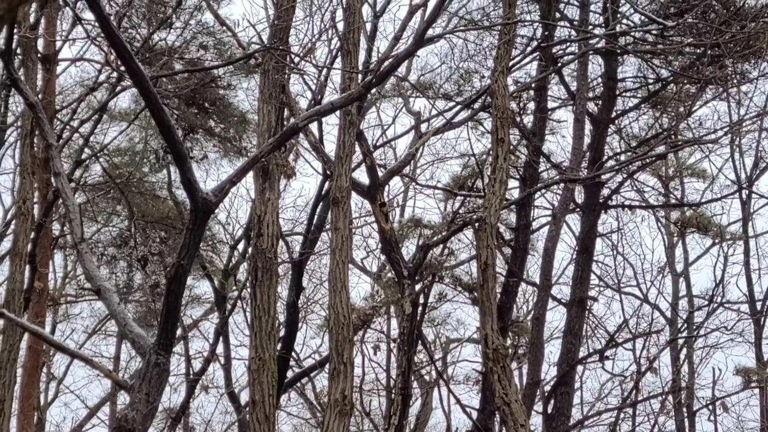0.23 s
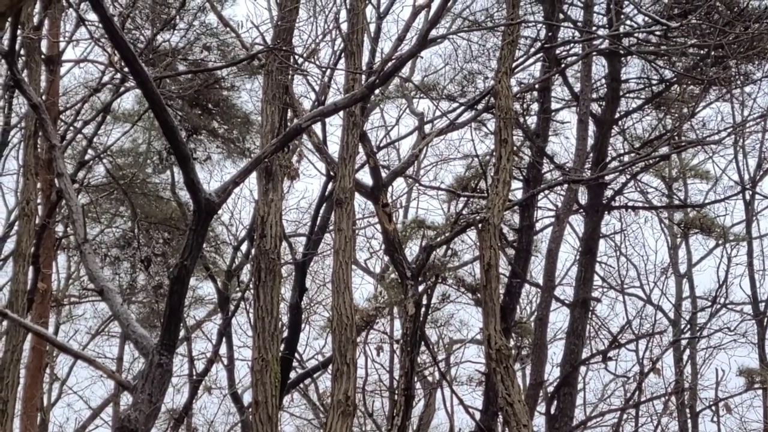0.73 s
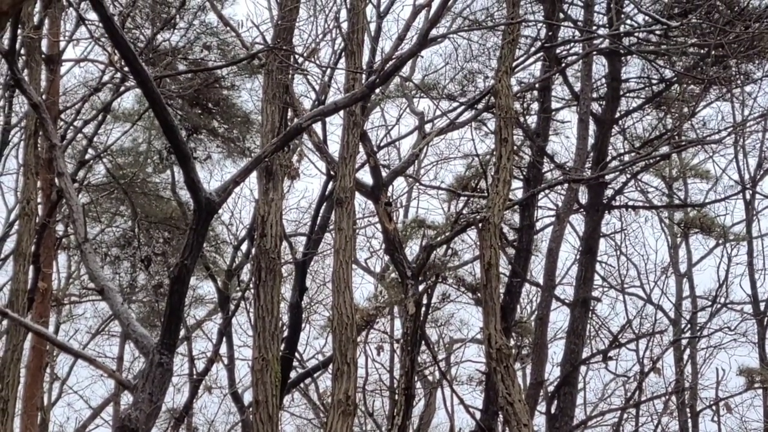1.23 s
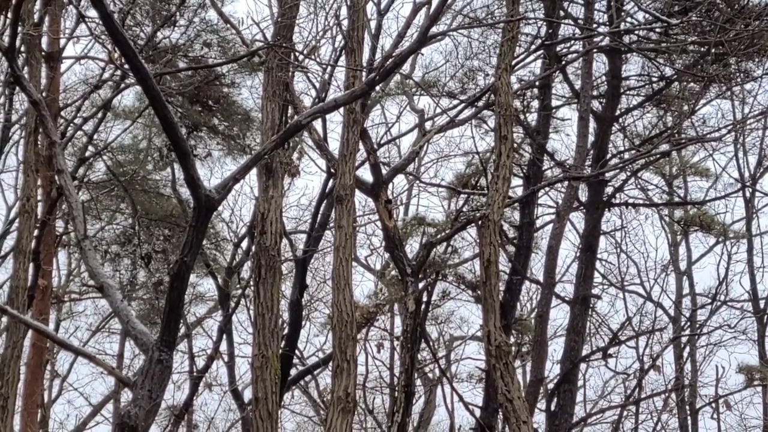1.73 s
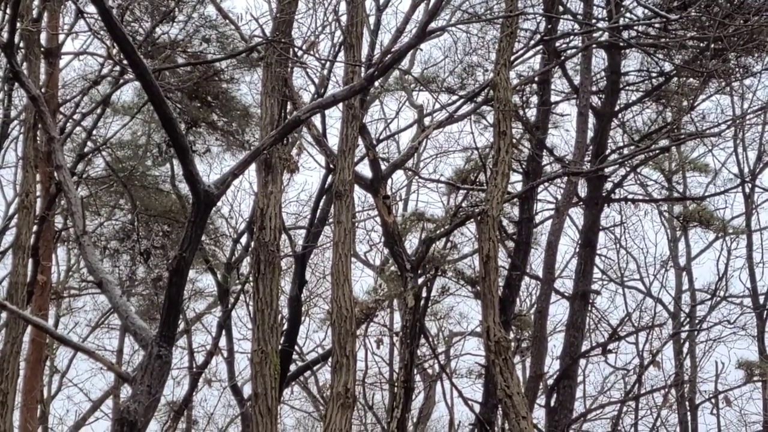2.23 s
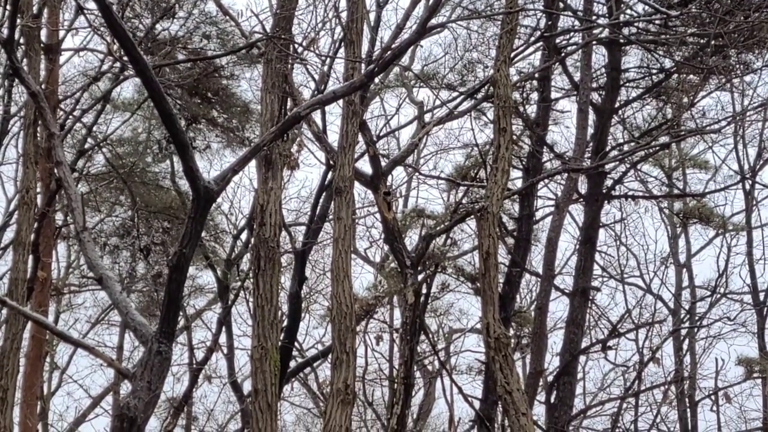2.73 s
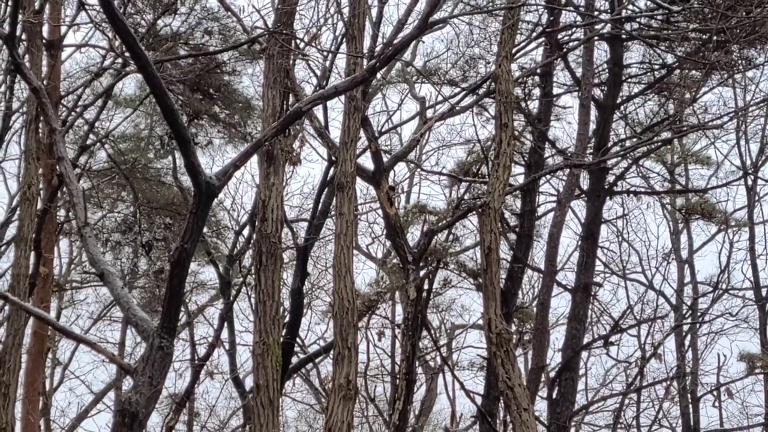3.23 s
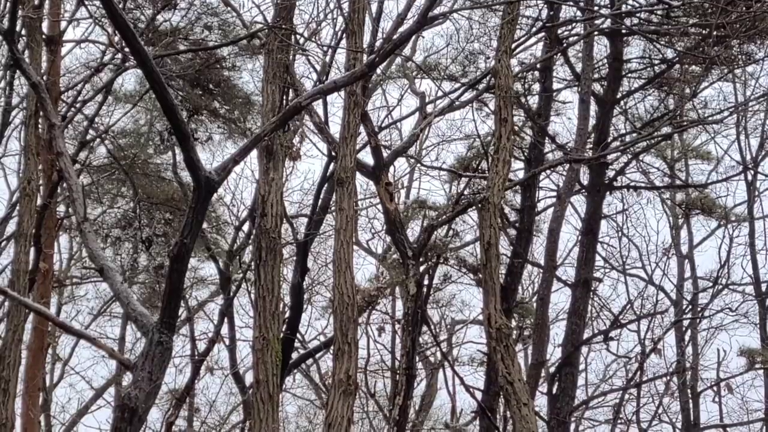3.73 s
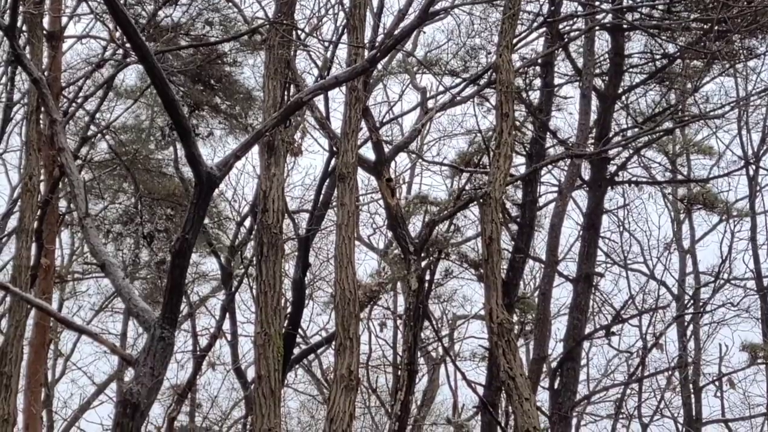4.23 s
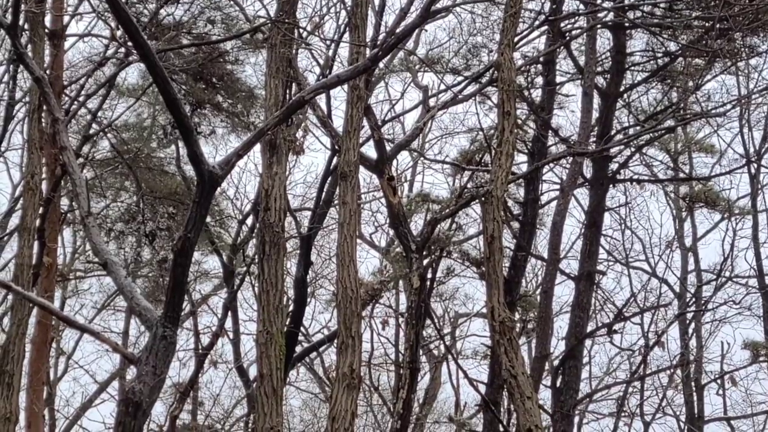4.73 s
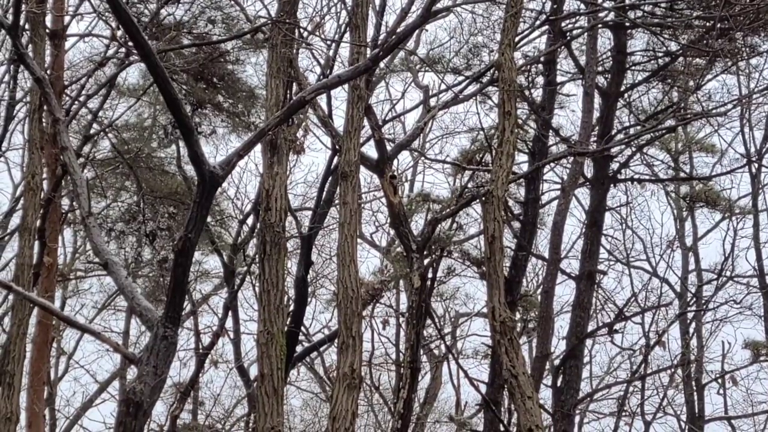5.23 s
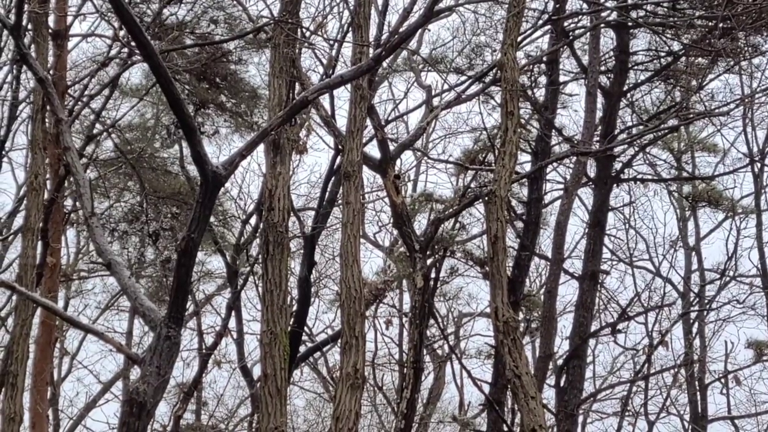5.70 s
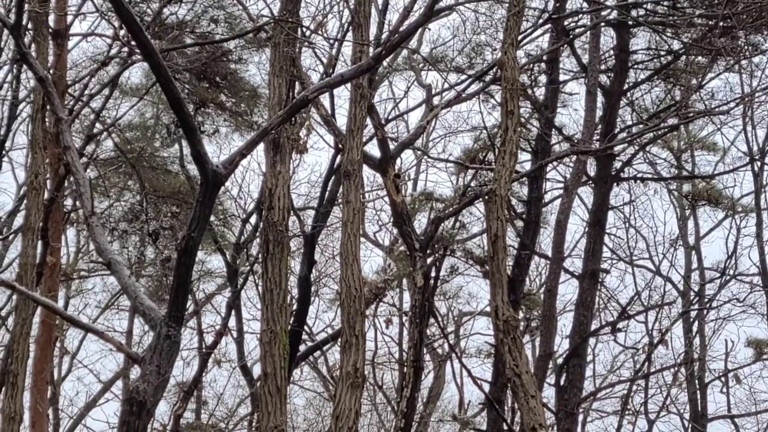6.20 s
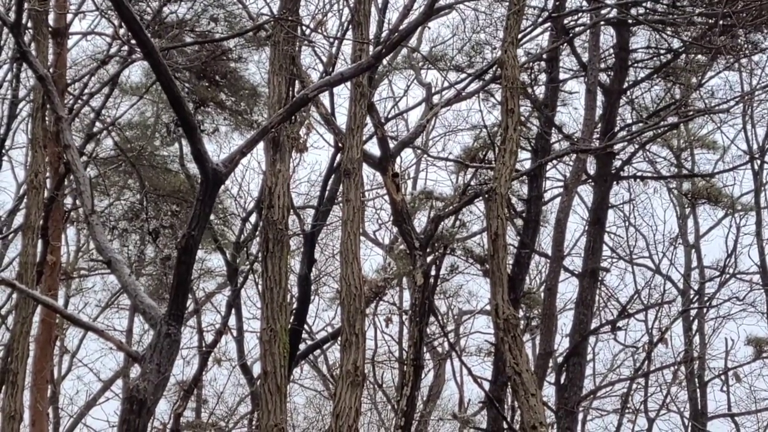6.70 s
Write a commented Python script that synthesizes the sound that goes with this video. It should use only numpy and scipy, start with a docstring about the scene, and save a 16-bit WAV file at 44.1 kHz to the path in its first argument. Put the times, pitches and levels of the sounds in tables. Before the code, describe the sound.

In a winter wood, a low, steady rush of wind in distant trees and a fine hiss lie under a woodpecker's faint, dry, irregular pecks on the right. Toward the end another bird gives one thin falling whistle and three short rising yelps that ring among the trunks. Soft puffs of air brush the microphone, and a louder gust briefly buffets it, mostly on the right.

```python
"""Woodpecker in a winter wood

A woodpecker chips at a dry branch: each blow knocks the wood, rings the bark and snaps fibres.
Under it lie a low, steady rush of wind in far trees and a fine hiss. Another bird gives one thin
falling whistle and three rising yelps that ring among the trunks. Puffs of air rumble at the
microphone ports, and near the end a gust buffets them, mostly the right one."""
import sys
import numpy as np
from scipy import signal
from scipy.fft import rfft, irfft, next_fast_len
from scipy.io import wavfile
from scipy.ndimage import map_coordinates

SR = 44100
rng = np.random.default_rng(int(sys.argv[2]) if len(sys.argv) > 2 else 0)


def log_audio(samples):
    """Write samples as a 16-bit WAV file to the path given in sys.argv[1]."""
    # one column per channel
    frames = np.atleast_2d(samples).T
    # limit to full scale, then quantise
    limited = np.clip(frames, -1, 1)
    pcm = np.round(limited * 32767).astype(np.int16)
    wavfile.write(sys.argv[1], SR, pcm)


N = 306936


def amp(db):
    """Decibels to gain."""
    return 10 ** (np.asarray(db) / 20)


def unit(x):
    """Scale to rms 1."""
    return x / np.sqrt(np.mean(x ** 2) + 1e-20)


def along(points, hz):
    """Read a curve of (f/Hz, value) points on a log frequency axis."""
    f, v = np.transpose(points)
    return np.interp(np.log(hz + 1), np.log(f + 1), v)


def wobble(rate):
    """A smooth random curve, rate knots a second."""
    return map_coordinates(rng.standard_normal(int(N * rate / SR) + 4), [np.arange(N) * rate / SR])


def filtered(x, response):
    """Shape x with a complex frequency response."""
    size = next_fast_len(N + SR // 2)
    return irfft(rfft(x, size) * response(np.fft.rfftfreq(size, 1 / SR)), size)[..., :N]


def noise(colour):
    """Two unrelated noises, together of rms 1, coloured by (f/Hz, level/dB) points."""
    return unit(filtered(rng.standard_normal((2, N)), lambda hz: amp(along(colour, hz))))


def from_right(x, lag_s):
    """The sound reaches the left port lag_s after the right one."""
    return filtered(x, lambda hz: np.exp(1j * np.pi * hz * lag_s * np.array([[-1], [1]])))


def add(track, start_s, sound):
    """Mix a sound into a track at start_s."""
    part = track[..., round(start_s * SR):][..., :sound.shape[-1]]
    part += sound[..., :part.shape[-1]]


def far_wind(roar_db=-50.5, treetop_db=-48, split_hz=450, ease_db_per_s=0.2234, swells_per_s=4.26):
    """A wide rush in far trees, centred in the bass; roar and treetops waver apart and slowly ease."""
    # colour of the wind: f/Hz, level/dB
    colour = [(15, -37), (25, -1), (43, -2), (80, -4), (135, -7), (200, -4.5), (300, -8.5), (400, -11.5),
              (600, -16.5), (770, -18.5), (1000, -26.5), (1500, -30.5), (2100, -41), (3000, -48.5),
              (5000, -120)]
    # how alike the wind is at the two ports: f/Hz, likeness (0 to 1)
    likeness = [(50, 1), (150, 1), (340, 0.95), (520, .6), (750, 0.37), (1100, 0.39), (1600, 0.3),
                (2500, 0.012)]

    def mid_side(hz):
        """The less alike the ports, the more goes to the side channel."""
        angle = np.arccos(np.clip(along(likeness, hz), -1, 1)) / 2
        return np.array([np.cos(angle), np.sin(angle)])

    ease_db = ease_db_per_s * np.arange(N) / SR
    roar_gain = amp(roar_db - ease_db - 0.14 * wobble(swells_per_s))
    treetop_gain = amp(treetop_db - ease_db + 0.2 * wobble(swells_per_s))
    mid, side = filtered(noise(colour), mid_side)
    air = unit(from_right(np.array([mid + side, mid - side]), lag_s=0.00037))
    roar = filtered(air, lambda hz: 1 / (1 + (hz / split_hz) ** 4))
    rush = roar_gain * roar + treetop_gain * (air - roar)
    return rush * amp([[-.6], [.6]])  # leans a little to the right


def hiss(hiss_db=-75.5, port_db=-80.5):
    """Fine steady hiss, with a narrow resonance at the left port."""
    # colours of the hiss and of the resonance: f/Hz, level/dB
    colour = [(500, -32), (2100, -3), (2900, 8.5), (4000, 5.5), (6500, 0.5), (9000, -2), (12000, 1.5),
              (15500, -0.5)]
    resonance = [(6000, -40), (7400, -10), (8000, 0), (8600, -11), (9400, -5), (10500, -15),
                 (14000, -24)]
    left_port = amp(port_db) * noise(resonance) * [[1], [0]]
    return amp(hiss_db) * noise(colour) + left_port


def strike(hz, width_hz, contact_s):
    """A brief scrape, swelling for contact_s, rings one heavily damped resonance; energy 1."""
    age = np.arange(SR // 16) / SR / contact_s
    scrape = age * np.exp(-age) * rng.standard_normal(len(age))
    edges = np.clip([hz - width_hz / 2, hz + width_hz / 2], 100, SR / 2 - 500)
    ring = signal.sosfilt(signal.butter(2, edges, "bandpass", fs=SR, output="sos"), scrape)
    return ring / np.linalg.norm(ring)


def beak_blow(knock_db, ring_hz, ring_db, snap_db):
    """One contact: the branch knocks, the bark rings at a pitch that depends on the spot, fibres snap."""
    hollow = amp(knock_db + 3) * strike(hz=750, width_hz=450, contact_s=.0025)
    knock = amp(knock_db + 1) * strike(hz=1400, width_hz=1200, contact_s=.0013)
    ring = amp(ring_db) * strike(hz=ring_hz, width_hz=950, contact_s=.0007)
    flake = amp(ring_db - 9) * strike(hz=4200, width_hz=1600, contact_s=.0008)
    snap = amp(snap_db + 2) * strike(hz=8200, width_hz=2200, contact_s=.0007)
    splinter = amp(snap_db - 5.5) * strike(hz=13000, width_hz=4800, contact_s=.0008)
    # torn fibres go on crackling for a moment after the blow
    crumbs = amp(snap_db - 8) * strike(hz=9500, width_hz=7000, contact_s=.009)
    return hollow + knock + ring + flake + snap + splinter + crumbs


def trunks(x, decay_scale):
    """Stereo scatter from the trunks; each frequency dies at its own speed."""
    # the wood's time to fall 60 dB, before decay_scale: f/Hz, t/s
    decay = [(300, .4), (1200, .8), (4000, .95), (6000, .8), (12000, .6)]
    hz, t, spectra = signal.stft(rng.standard_normal((2, SR)), SR, nperseg=256)
    t60_s = decay_scale * along(decay, hz)[:, None]
    _, tail = signal.istft(spectra * amp(-60 * t / t60_s), SR, nperseg=256)
    return signal.fftconvolve(x[None], tail / np.linalg.norm(tail[0]), axes=1)[:, :N]


def woodpecker(gain_db=19, left_db=-7, near_db=-9, far_db=-22):
    """Dry pecks on the right, answered by the nearest branches and faintly by the wood."""
    # beak blows and bark snaps, levels relative: t/s, crack/dB, knock/dB, ring/Hz, brightness/dB
    pecks = [(0.3167, -54, -56.5, 6020, -5.5), (0.3608, -58, -73, 6270, 0), (.5866, -52.5, -52.5, 5860, -4),
             (0.633, -54, -62, 6300, 0), (.854, -46.5, -58, 5860, 1.5), (0.892, -65, -69, 6470, 4),
             (1.2846, -58, -61, 5840, 0), (1.572, -69, -75, 4770, 3.5), (2.016, -57, -59.5, 4800, -1),
             (2.395, -65, -60.5, 6200, -4), (2.7674, -56, -58, 6300, 1), (2.9615, -61, -55.5, 6260, 0),
             (3.5079, -71, -71, 4540, 2), (3.8918, -62, -61, 6540, -3), (4.106, -57.5, -57.5, 5200, -1),
             (4.724, -64.5, -57, 6240, -3.5), (5.3747, -63.5, -62, 6400, 2.5), (5.5675, -74, -61, 6160, 3),
             (5.7603, -65.5, -55.5, 4640, -1)]
    taps = np.zeros(N)
    for start_s, crack_db, knock_db, ring_hz, bright_db in pecks:
        # a bright peck snaps more and rings less
        blow = beak_blow(knock_db, ring_hz, ring_db=crack_db - bright_db, snap_db=crack_db + bright_db)
        add(taps, start_s, amp(gain_db) * blow)
    near = amp(near_db) * trunks(taps, decay_scale=.17)
    far = amp(far_db) * trunks(taps, decay_scale=.6)
    return taps * amp([[left_db], [0]]) + near + far


def port_flow(draught_db=-64.5, growth_db_per_s=1.41, attack_s=0.031, release_s=0.042):
    """Strength of the air at each port: a slowly growing draught, and puffs that rise, hold and die."""
    # puffs of wind: t/s, hold/s, left/dB, right/dB
    puffs = [(1.45, 0.17, -58, -56), (3.196, 0.13, -48.5, -50), (4.923, 0.13, -49, -58),
             (5.427, 0.23, -48.5, -47.5), (5.89, 0.065, -43.5, -60), (6.224, 0.023, -41, -39),
             (6.321, 0.12, -52, -28.5), (6.503, 0.12, -47, -36.5), (6.8, .14, -46, -42)]
    t = np.arange(N) / SR
    flow = amp(draught_db + growth_db_per_s * t)
    for start_s, hold_s, left_db, right_db in puffs:
        before, after = np.maximum(start_s - t, 0), np.maximum(t - start_s - hold_s, 0)
        envelope = np.exp(-before / attack_s - after / release_s)
        flow = np.maximum(flow, amp([[left_db], [right_db]]) * envelope)
    return flow


def gust():
    """Turbulence rumbles separately at each port; single eddies give a soft pressure thump."""
    # colour of the turbulence: f/Hz, level/dB
    colour = [(12, -22), (28, -3), (45, 0), (68, 0), (100, -8), (150, -15), (250, -28), (500, -50),
              (1200, -75), (3000, -120)]
    # eddies that hit the ports: t/s, half length/s, left/dB, right/dB
    eddies = [(6.245, .0042, -30, -29), (6.33, .0028, -55, -21), (6.404, .0023, -55, -19.5),
              (6.502, .003, -44, -21.5)]
    rumble = port_flow() * noise(colour)
    for centre_s, half_s, left_db, right_db in eddies:
        offset = (np.arange(N) / SR - centre_s) / half_s
        thump = (1 - offset ** 2) * np.exp(-offset ** 2 / 2)
        rumble += amp([[left_db], [right_db]]) * thump
    return rumble


def bird_note(t, hz, db, roughness, length_s, drop_oct, partials, drop_db=12):
    """A harmonic note, hoarse from its quivering pitch; after length_s it drops and fades."""
    closing = np.clip((t - length_s) / (t[-1] - length_s), 0, 1)
    quiver = 1 + roughness * wobble(rate=300)[:len(t)]
    pitch_hz = hz * 2 ** (-drop_oct * closing) * quiver
    phase = 2 * np.pi * np.cumsum(pitch_hz) / SR
    tremble_db = 2.5 * wobble(rate=62.4)[:len(t)]
    tone = sum(amp(level_db) * np.sin(round(k) * phase) for k, level_db in partials)
    return amp(db + tremble_db - drop_db * closing) * tone


def falling_whistle(start_s=4.72, length_s=.55, drop_s=0.027):
    """One thin note, its fundamental missing, that grows louder and hoarser as it slides down."""
    # overtones of the whistle: harmonic number, level/dB
    partials = [(2, -1), (3, -3), (4, -11.5)]
    high_hz, low_hz, sag_hz_per_s = 1676, 1510, 110
    slide_middle_s, slide_width_s = .41, .042
    full_db, swell_db_per_s = -70.5, 20.5
    clear, hoarse = 0.01, 0.0304  # pitch quiver on the high and on the low note
    t = np.arange(0, length_s + drop_s, 1 / SR)
    slide = 1 / (1 + np.exp((slide_middle_s - t) / slide_width_s))
    hz = high_hz + (low_hz - high_hz) * slide - sag_hz_per_s * t
    db = full_db + swell_db_per_s * (t - length_s)
    roughness = clear + (hoarse - clear) * slide
    voice = np.zeros(N)
    add(voice, start_s, bird_note(t, hz, db, roughness, length_s, drop_oct=.27, partials=partials))
    return voice


def rising_yelps(start_hz=716, rise_s=.038, attack_s=0.051, attack_db=12.5, sag_db_per_s=38):
    """Each yelp starts low and scratchy and clears as it nears its top pitch; the throat colours it."""
    # the yelps: t/s, length/s, closing drop/s, top pitch/Hz, relative level/dB
    yelps = [(5.748, .096, .008, 2286, -59), (6.093, .106, .025, 2346, -58), (6.907, .1, .015, 2274, -60)]
    # partials of the voice: harmonic number, level/dB
    partials = [(1, -27), (2, 0), (3, -12), (4, -10)]
    # the throat favours 4.4 and 5.5 kHz: f/Hz, gain/dB
    throat = [(1000, 0), (2500, 0), (3500, -2), (4400, .5), (4900, -1), (5500, 1), (5850, -4), (6300, -16),
              (7500, -32)]
    voice = np.zeros(N)
    for start_s, length_s, drop_s, top_hz, level_db in yelps:
        t = np.arange(0, length_s + drop_s, 1 / SR)
        slack = np.exp(-t / rise_s)  # the pitch climbs fast, then levels off
        hz = top_hz + (start_hz - top_hz) * slack
        onset_db = attack_db * np.maximum(1 - t / attack_s, 0)
        sag_db = sag_db_per_s * np.maximum(t - attack_s, 0)
        db = level_db - onset_db - sag_db
        roughness = .022 + .035 * slack
        add(voice, start_s, bird_note(t, hz, db, roughness, length_s, drop_oct=1.1, partials=partials))
    return filtered(voice, lambda hz: amp(along(throat, hz)))


def far_bird(yelp_direct_db=-4, yelp_early_db=-3.5, whistle_echo_db=0.5):
    """The calls come from the right; near trunks scatter the yelps, and the whole wood rings."""
    whistle, yelps = falling_whistle(), rising_yelps()
    direct = from_right(whistle + amp(yelp_direct_db) * yelps, lag_s=.00047)
    early = amp(yelp_early_db) * trunks(yelps, decay_scale=0.078)
    echo = trunks(amp(whistle_echo_db) * whistle + yelps, decay_scale=0.87)
    return direct + early + echo


def scene():
    """Both birds in the windy wood."""
    return woodpecker() + far_bird() + far_wind() + gust() + hiss()


def record(dry):
    """A brick-wall low-pass cuts the highest treble."""
    return filtered(dry, lambda hz: hz < 15850)


dry = scene()
out = record(dry)
log_audio(out)
```